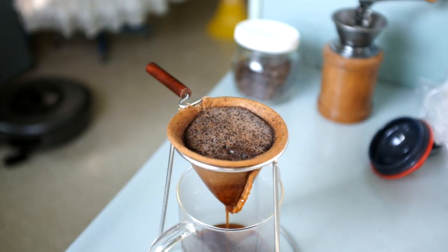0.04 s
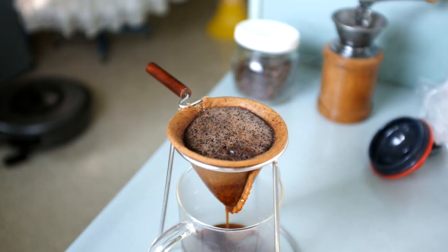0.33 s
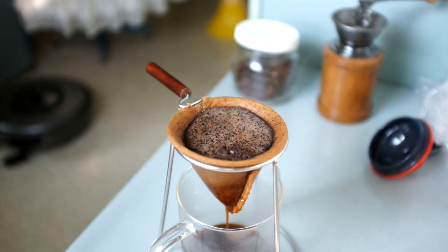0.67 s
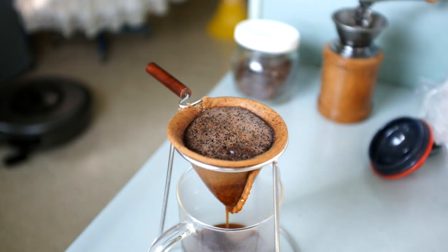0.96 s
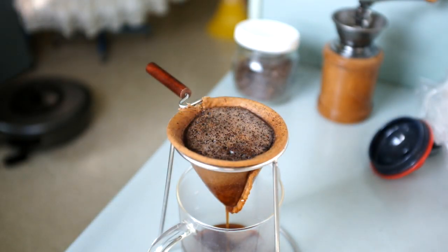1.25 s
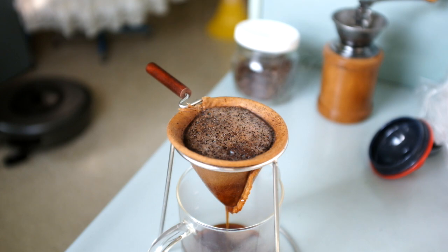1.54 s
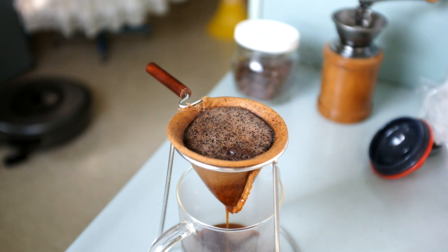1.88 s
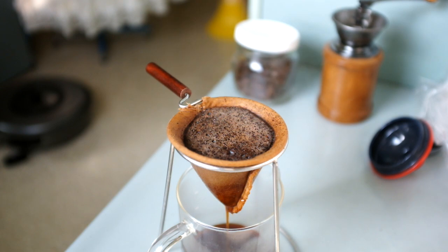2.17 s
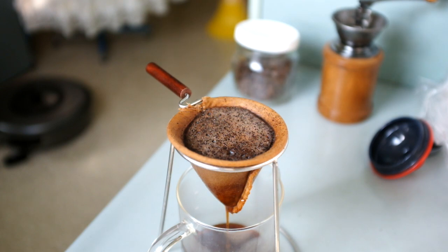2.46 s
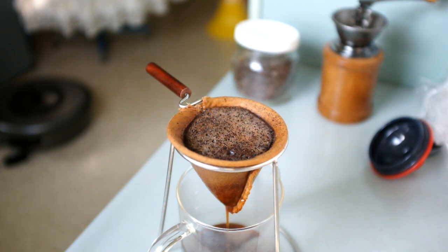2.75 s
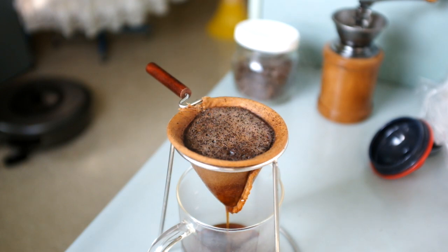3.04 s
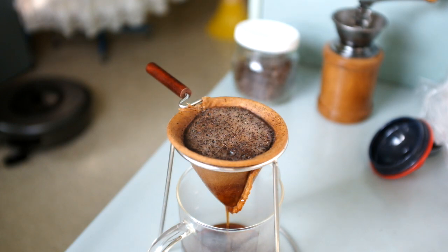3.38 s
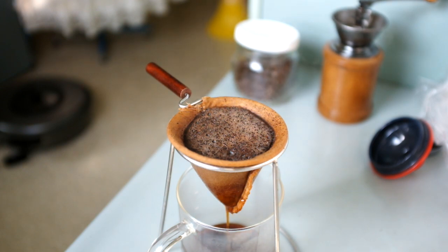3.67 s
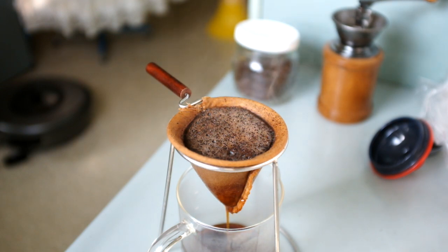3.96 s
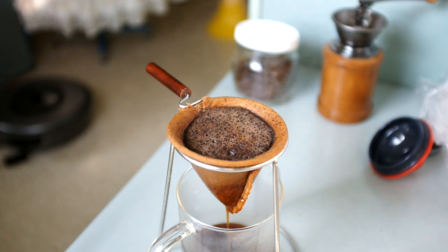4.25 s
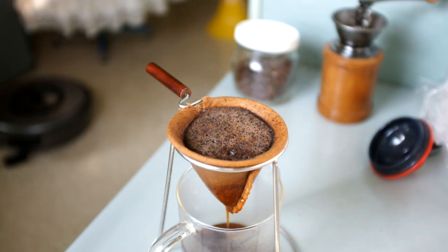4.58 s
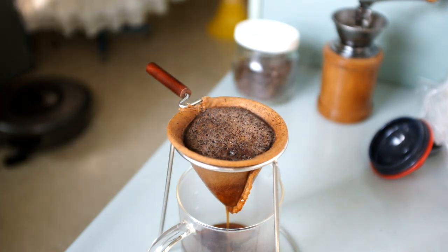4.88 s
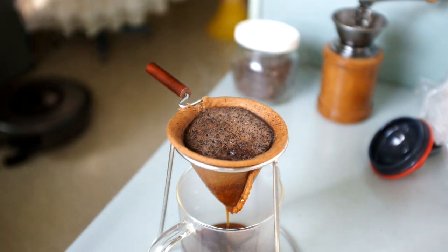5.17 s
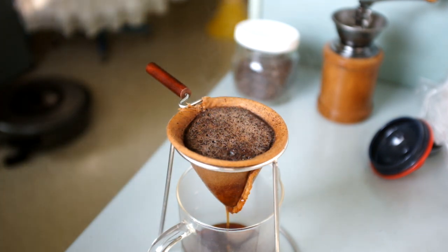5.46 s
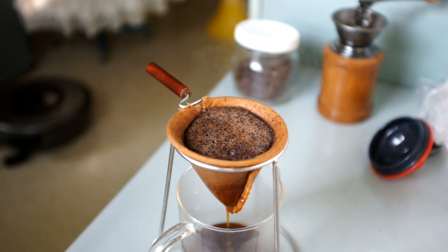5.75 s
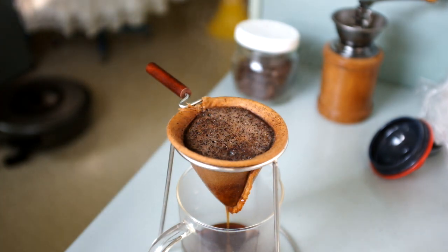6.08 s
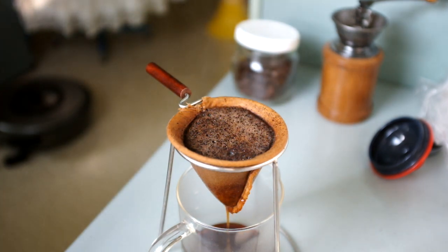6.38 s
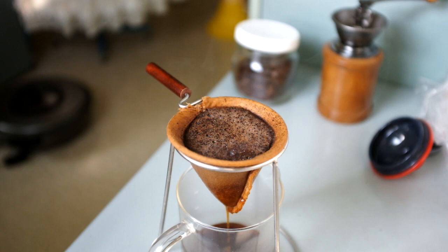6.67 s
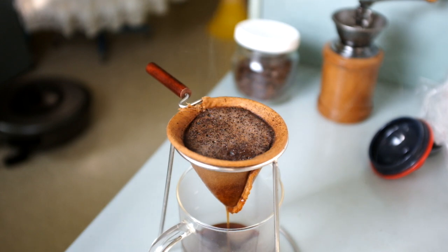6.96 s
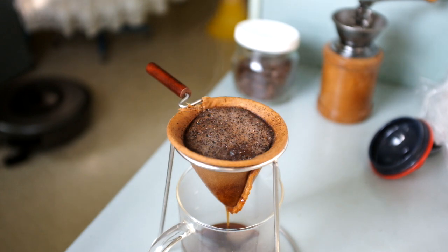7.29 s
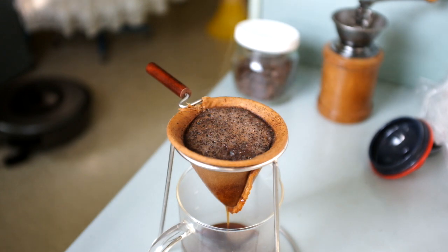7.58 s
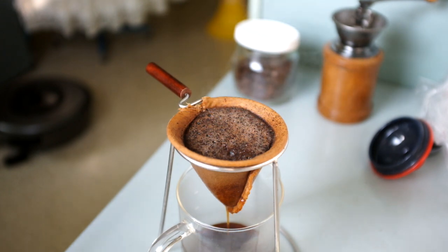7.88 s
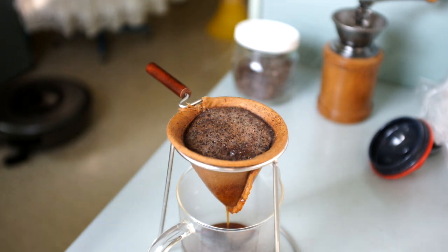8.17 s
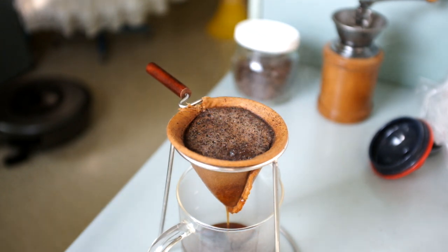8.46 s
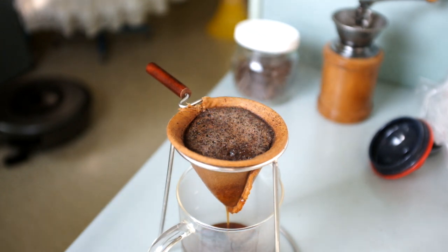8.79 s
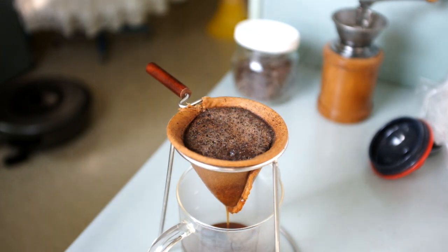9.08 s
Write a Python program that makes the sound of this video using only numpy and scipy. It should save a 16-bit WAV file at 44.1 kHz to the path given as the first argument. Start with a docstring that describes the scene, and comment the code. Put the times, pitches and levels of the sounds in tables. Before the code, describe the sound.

Coffee trickles and drips into a glass server over faint kitchen hum, with a brief metal clatter and one dull knock.

```python
"""Coffee trickles from a cloth filter into a glass server on a kitchen counter.
The thread breaks into drops: each ticks on the surface, plops and rings in the glass; some trap a
tiny bubble. Nearby, metal clatters four times from 4.1 s, and at 6.3 s something is put down with
a dull knock. Soft bloops, scuffs and rustles come and go; the kitchen hums faintly."""
import sys
import numpy as np
from scipy import signal
from scipy.fft import rfft, irfft, next_fast_len
from scipy.io import wavfile

SR = 44100
rng = np.random.default_rng(int(sys.argv[2]) if len(sys.argv) > 2 else 0)


def wrap_up_sound(samples):
    """Save the sound to the file named by the first command line argument, as 16-bit audio."""
    columns = np.atleast_2d(samples).T
    # keep every value between -1 and 1, then stretch to whole-number steps
    tamed = np.clip(columns, -1, 1)
    steps = np.round(tamed * 32767).astype(np.int16)
    wavfile.write(sys.argv[1], SR, steps)


N = 411453

# fat drops; all drop rows are (time [s], plop pitch [Hz], relative plop [dB], relative splash [dB])
FAT_DROPS = [(0.045, 1700, -34.5, -42.5), (0.131, 1310, -35, -47.5), (0.313, 1714, -32.5, -50),
             (0.3416, 1750, -36, -44.5), (0.432, 2270, -36, -62), (0.629, 1850, -37.5, -48),
             (0.818, 2160, -36.5, -44.5), (0.952, 1920, -29, -45.5), (1.0437, 1540, -32, -43),
             (1.112, 1850, -39, -49), (1.182, 1352, -34.5, -52), (1.267, 1620, -52, -43),
             (1.2864, 1900, -40, -38.5), (1.300, 1770, -33.5, -62), (1.358, 1770, -35.5, -49),
             (1.3976, 1850, -29.5, -48.5), (1.444, 1660, -39, -45.5), (1.528, 1890, -31.5, -58),
             (1.699, 1830, -35, -52), (2.009, 2260, -30.5, -41.5), (2.115, 1830, -38.5, -54),
             (2.2073, 1800, -34.5, -62), (2.236, 1740, -31.5, -46), (2.463, 1910, -37, -55),
             (2.529, 2060, -35, -50), (2.5872, 1390, -32, -47), (2.649, 1880, -35, -51),
             (2.756, 1850, -35.5, -51), (2.786, 1800, -33, -49), (2.9675, 1860, -34, -46),
             (3.233, 1790, -36.5, -45.5), (3.783, 2060, -36.5, -53), (3.835, 2050, -35, -46),
             (4.6843, 1950, -34.5, -53), (4.727, 1830, -33, -45.5), (4.758, 1762, -37.5, -43.5),
             (4.915, 1900, -28, -42), (5.056, 2150, -33, -54), (5.120, 1770, -34, -41.5),
             (5.163, 1870, -33.5, -51), (5.254, 1910, -38, -50), (5.3072, 1790, -35, -46),
             (5.426, 1790, -36.5, -57), (5.5469, 1890, -31, -51.5), (5.5973, 2170, -35, -48.5),
             (5.676, 2310, -33.5, -60), (5.7298, 1900, -32.5, -49), (5.771, 2080, -36, -47),
             (5.783, 1660, -33.5, -44), (5.853, 1840, -33, -45), (5.92, 1700, -43, -40.5),
             (6.946, 1887, -33.5, -53), (7.061, 1630, -34, -49.5), (7.177, 2090, -31.5, -42.5),
             (7.206, 1770, -35.5, -51), (7.261, 1890, -38, -43), (7.3468, 2050, -32, -41.5),
             (7.492, 1890, -37, -44), (7.565, 2080, -33, -58), (7.725, 1750, -38, -42),
             (7.999, 1700, -37, -37.5), (8.082, 1830, -33, -46), (8.46, 1800, -36.5, -50),
             (8.676, 1798, -37.5, -38.5), (8.764, 1920, -33.5, -50), (8.902, 1700, -42, -42),
             (9.289, 1750, -40, -49)]
# contacts of the knock: (time [s], relative level [dB])
CONTACTS = [(6.3296, 0), (6.3337, 3.5), (6.3414, -18), (6.3506, -12)]


def trickle():
    """Drop rows: fat drops, drips, their rebounds, fine spatter and spurts."""
    # the thread splutters: (start [s], end [s], relative plop [dB])
    splutters = [(0.55, 0.609, -39), (2.469, 2.535, -37), (2.587, 2.632, -41.5), (2.976, 3.015, -43),
                 (7.14, 7.21, -50), (7.299, 7.381, -46)]
    falling = np.vstack([FAT_DROPS, with_flow(drips(gap_s=0.058, refill_s=0.03), share=0.79)])
    rebounds = [fallback(falling, delay_s=0.0076, size_db=-9.5),
                fallback(falling, delay_s=0.015, size_db=-15.5)]
    spatter = droplets(0, N / SR, per_s=70, hz=1850, plop_db=-46.5, splash_db=-59.5)
    spurts = [droplets(start, end, per_s=260, hz=1750, plop_db=db, splash_db=-59)
              for start, end, db in splutters]
    return np.vstack([falling, *rebounds, with_flow(spatter, share=0.43), *spurts])


def drips(gap_s, refill_s):
    """Drop rows: the thread pinches off at a nearly even pace, except where a fat drop empties it."""
    scatter = np.clip(rng.standard_normal((300, 4)), -2, 1.6)
    s = np.cumsum(gap_s * np.exp(0.35 * scatter[:, 0]))
    hz = 1830 * np.exp(0.066 * scatter[:, 1])
    plop_db, splash_db = -41 + 3 * scatter[:, 2], -51.5 + 5.5 * scatter[:, 3]
    nearest_fat_s = np.abs(s[:, None] - np.array(FAT_DROPS)[:, 0]).min(axis=1)
    return np.c_[s, hz, plop_db, splash_db][(s < N / SR) & (nearest_fat_s > refill_s)]


def fallback(rows, delay_s, size_db):
    """Drop rows: each drop throws up a smaller one, which falls back at a pitch near its own."""
    scatter = rng.standard_normal((len(rows), 3))
    s, hz, plop_db, splash_db = np.transpose(rows)
    landing_s = s + delay_s * np.exp(0.5 * scatter[:, 0])
    step_db = size_db + 2 * scatter[:, 2]
    smaller = np.c_[landing_s, hz * np.exp(0.1 * scatter[:, 1]), plop_db + step_db, splash_db + step_db]
    return smaller[landing_s < N / SR]


def droplets(start_s, end_s, per_s, hz, plop_db, splash_db):
    """Drop rows: small droplets at random times."""
    when, lottery = rng.random((1200, 2)).T
    scatter = np.clip(rng.standard_normal((1200, 3)), -2, 1.7)
    span_s = end_s - start_s
    levels_db = [plop_db, splash_db] + 4 * scatter[:, 1:]
    rows = np.c_[start_s + span_s * when, hz * np.exp(0.14 * scatter[:, 0]), levels_db]
    return rows[lottery < per_s * span_s / len(rows)]


def with_flow(rows, share):
    """Drops grow and shrink with the vigour of the trickle."""
    # vigour: (time [s], relative level [dB])
    flow = [(0, -2), (0.6, -6.5), (0.75, -3.5), (1.15, 1.5), (1.45, -1), (1.75, -2), (2.35, 0), (2.7, 4),
            (3.15, -5), (3.9, -1.5), (4.8, 2.5), (5.9, 1.5), (6.25, -6.5), (6.9, -2), (7.3, 0.5), (7.7, 1),
            (8.6, -3.5), (9.33, -4.5)]
    vigour_db = np.interp(rows[:, 0], *np.transpose(flow))
    return rows + share * np.outer(vigour_db, [0, 0, 1, 1])


def drops(rows, plop_gain_db, splash_gain_db, wall_s, wall_db):
    """Each drop ticks and slaps, and its dent rings; returns direct sound and bounce off the glass."""
    # splash spectrum: (frequency [Hz], relative level [dB])
    splash = [(500, -43), (1200, -13), (2600, 5.5), (4000, -2), (5800, 0), (7500, -2), (9000, -5),
              (10500, -8), (13000, -12), (16000, -40)]
    direct, bounce, t = np.zeros(N), np.zeros((2, N)), clock(768)
    hiss = noise(splash, N + 1024)
    sharp = butter(rng.standard_normal(N + 1024), order=2, hz=8900, kind="high")
    slap_shape = fade(t, t60_s=0.0059) * (1 - np.exp(-t / 0.00017))
    tick_shape = fade(t, t60_s=0.0021)
    spots = rng.random((len(rows), 4))  # landing spot sets two wall delays, tint and tick level
    for (s, hz, plop_db, splash_db), spot in zip(rows, spots):
        i, tint_hz = round(s * SR), np.interp(spot[2], [0, 1], [3000, 11500])
        slap = hiss[i:i + len(t)] * slap_shape
        slap = rms_one(slap + from_db(5.5) * resonate(slap, tint_hz, 0.16 * tint_hz))
        tick = from_db(-16.5 + 11 * spot[3]) * rms_one(sharp[i:i + len(t)] * tick_shape)
        plop = rms_one(bubble(t, hz, rise_s=0.0003, t60_s=0.0067, glide=0.0097))
        drop = from_db(splash_db + splash_gain_db) * (slap + tick)
        drop += from_db(plop_db + plop_gain_db) * plop
        add(direct, s, drop)
        for channel, delay_s in zip(bounce, wall_s * (0.5 + spot[:2])):
            add(channel, s + delay_s, from_db(wall_db) * drop)
    return direct, bounce


def bubble(t, hz, rise_s, t60_s, glide):
    """A damped sine whose pitch slides by the fraction glide as it dies."""
    pitch_hz = hz * (1 + glide * (0.5 - fade(t, t60_s)))
    return np.sin(2 * np.pi * np.cumsum(pitch_hz) / SR) * (1 - np.exp(-t / rise_s)) * fade(t, t60_s)


def pings(gain_db, faint_per_s, low_hz, high_hz):
    """Tiny trapped bubbles ring high and rise in pitch as they near the surface."""
    # clearest bubbles: (time [s], pitch [Hz], relative level [dB])
    clear = [(0.605, 4166, -43.5), (2.159, 2910, -45), (2.463, 5205, -43.5), (2.722, 8680, -41.5),
             (3.314, 5340, -39), (5.634, 7000, -40.5), (5.782, 4740, -44), (7.146, 8750, -45),
             (9.308, 3220, -44)]
    when, pitch, size, lottery = rng.random((200, 4)).T
    faint = np.c_[when * N / SR, low_hz * (high_hz / low_hz) ** pitch, -60 + 12 * size]
    faint = faint[lottery < faint_per_s * N / SR / len(faint)]
    out, t = np.zeros(N), clock(2048)
    for s, hz, db in np.vstack([clear, faint]):
        ping = bubble(t, hz, rise_s=0.00042, t60_s=0.012, glide=0.1)
        add(out, s + 0.000985, from_db(db + gain_db) * ping)
    return out


def fizz(per_s, spread_db, level_db):
    """The finest spray: a steady crackle of tiny bursting bubbles."""
    sizes = from_db(spread_db * np.minimum(rng.exponential(1, N), 3)) * rng.choice([-1, 1], N)
    clicks = sizes * (rng.random(N) < per_s / SR)
    pitches_hz, band = np.geomspace(2600, 10000, 12), rng.integers(0, 12, N)
    crackle = sum(resonate(clicks * (band == k), hz, hz / 7) for k, hz in enumerate(pitches_hz))
    return from_db(level_db) * rms_one(crackle)


def server(x, ring_db):
    """The glass and the air in it ring at their resonances."""
    # resonances: (frequency [Hz], width [Hz], relative gain [dB])
    modes = [(1688, 12, 9.5), (1759, 93, 14), (1890, 35, 11), (2232, 53.5, 18), (2343, 60, 16.5),
             (3500, 68, 2), (4810, 380, 5), (6960, 69, 5.5), (7330, 99, 13.5), (8565, 61, 17),
             (10770, 97, 15.5), (11900, 61, 13.5)]
    return x + from_db(ring_db) * sum(from_db(db) * resonate(x, hz, width) for hz, width, db in modes)


def bloops(gain_db):
    """Low, hollow notes that swell and sag a little."""
    # notes: (time [s], pitch [Hz], relative level [dB])
    notes = [(0.678, 777, -33.5), (1.837, 623, -26), (1.856, 604.5, -26.5), (2.001, 615, -27),
             (2.018, 600, -32.5)]
    out, t = np.zeros(N), clock(8192)
    for s, hz, db in notes:
        add(out, s, from_db(db + gain_db) * bubble(t, hz, rise_s=0.0046, t60_s=0.053, glide=-0.0085))
    return out


def clatter(ring_db):
    """Each blow sets off a dense rattle, whose top dies first, and metal modes in close clusters."""
    # blows: (time [s], relative level [dB], treble [dB], rise [s])
    blows = [(4.0562, -17.5, -1.5, 0.0041), (4.185, -21.5, -3.5, 0.0014), (4.283, -25.5, 1, 0.0029),
             (4.438, -29, -3, 0.004)]
    # rattle spectrum: (frequency [Hz], relative level [dB])
    spectrum = [(50, -12), (130, -2), (200, -15), (370, 1), (800, 0), (1300, 3.5), (1700, 0), (2800, -5.5),
                (5000, -7), (7500, 0), (10000, 1), (13000, -10.5), (16000, -30)]
    # metal modes: (frequency [Hz], relative level [dB])
    modes = [(199, -11.5), (280, -18), (366, -13), (1152, -14), (1416, -8), (2180, -9), (3130, -19),
             (3345, -7), (3830, -12), (4750, -3), (5385, -6), (6907, -8), (7558, -17), (8440, -16)]
    out, t = np.zeros(N), clock(32768)
    strike = 1 + 0.55 * fade(t, t60_s=0.095)  # the contact stands above the ringing
    for s, db, treble_db, rise_s in blows:
        rattle = noise(spectrum, len(t))
        low = butter(rattle, order=1, hz=3500)
        blow = low * fade(t, t60_s=0.4) + from_db(treble_db) * (rattle - low) * fade(t, t60_s=0.14)
        for hz, mode_db in modes:
            cluster = resonate(rng.standard_normal(len(t) + 2048), hz, 29.6 * np.sqrt(hz / 1000))
            ring = rms_one(cluster[2048:]) * fade(t, t60_s=0.36)
            blow += from_db(ring_db + mode_db + treble_db * (hz > 3000)) * ring
        add(out, s, from_db(db) * blow * strike * (1 - np.exp(-t / rise_s)))
    return out


def knock(gain_db, cushion_hz):
    """A solid thing lands and settles in a few quick, cushioned contacts."""
    # modes of thing and counter: (frequency [Hz], relative level [dB], t60 [s])
    modes = [(77, -26, 0.5), (113.7, -23.5, 0.42), (171, -21, 0.12), (389, -6, 0.077), (443, -32, 0.25),
             (623, -1, 0.04), (665, -29, 0.3), (770, -36, 0.42), (847, -6, 0.041), (970, -10, 0.026),
             (1500, -10, 0.013), (2200, -6.5, 0.01), (2180, -32.5, 0.34), (3560, -23, 0.32)]
    out, t = np.zeros(N), clock(32768)
    body = sum(from_db(db) * np.cos(2 * np.pi * hz * t) * fade(t, t60_s) for hz, db, t60_s in modes)
    body = butter(body, order=2, hz=cushion_hz)
    for s, db in CONTACTS:
        add(out, s, from_db(db + gain_db) * body)
    return out


def crack(level_db, t60_s, hz, width_hz):
    """The first hard touch of the knock gives a short, bright click."""
    out, t = np.zeros(N), clock(2048)
    burst = rms_one(resonate(rng.standard_normal(len(t)), hz, width_hz))
    add(out, CONTACTS[0][0], from_db(level_db) * burst * fade(t, t60_s))
    return out


def scuffs():
    """Things being moved: friction noise in one resonance, swelling and fading."""
    # rubs: (start [s], length [s], centre [Hz], width [fraction of centre], level [dB])
    rubs = [(0.03, 0.085, 1220, 0.087, -36), (0.035, 0.061, 780, 0.2, -39), (0, 0.16, 261, 3, -38),
            (2.836, 0.32, 713, 0.14, -45), (4.412, .1, 457, 2.44, -43), (6.579, 0.053, 580, 0.59, -33.5),
            (6.586, 0.061, 129, 0.75, -37.5), (7.53, 0.055, 620, 0.42, -45.5)]
    out, t = np.zeros(N), clock(16384)
    for s, length_s, hz, width, db in rubs:
        rub = resonate(resonate(rng.standard_normal(len(t)), hz, width * hz), hz, 2 * width * hz)
        swell = np.sin(np.pi * np.clip(t / length_s, 0, 1) ** 0.71)
        add(out, s, from_db(db) * rms_one(rub) * swell)
    return out


def rustles(hz, width_hz):
    """Brief, soft hisses of something sliding."""
    # slides: (start [s], length [s], level [dB])
    slides = [(0.015, 0.13, -51), (1.82, 0.35, -54), (2.846, 0.31, -58)]
    out, t = np.zeros(N), clock(16384)
    for s, length_s, db in slides:
        hiss = rms_one(resonate(rng.standard_normal(len(t)), hz, width_hz))
        add(out, s, from_db(db) * hiss * np.sin(np.pi * np.clip(t / length_s, 0, 1)))
    return out


def hum():
    """Narrow, wavering drones of the kitchen."""
    # drones: (frequency [Hz], half-width of each filter [Hz], level [dB])
    drones = [(59.4, 3.2, -57), (114.6, 22, -59), (292.6, 20.7, -61.5), (615, 13, -59.5), (683, 33, -60.5)]
    out = np.zeros(N)
    for hz, half_hz, db in drones:
        band = resonate(rng.standard_normal(N), hz, 2 * half_hz)
        out += from_db(db) * rms_one(resonate(band, hz, 2 * half_hz))
    return out


def kitchen_air(midway_db, fall_db_per_s):
    """Diffuse room noise that slowly grows quieter."""
    # air spectrum: (frequency [Hz], relative density [dB])
    spectrum = [(20, 3), (60, -5), (200, -3), (520, -0.5), (680, -0.5), (1100, -4), (2400, -9),
                (3800, -14.5), (7300, -20), (12800, -23.5), (16000, -37)]
    return diffuse(spectrum, N) * from_db(midway_db - fall_db_per_s * (clock(N) - N / SR / 2))


def reverb(x, t60_s, wet_db, treble_db):
    """Dense reflections that start a few ms late and die away."""
    t = clock(32768)
    onset = np.clip(t / 0.0017 - 1, 0, 1)
    tail = diffuse([(1500, 0), (12000, treble_db)], len(t)) * fade(t, t60_s) * onset
    tail /= np.sqrt(np.mean(np.sum(tail ** 2, axis=1)))
    return from_db(wet_db) * signal.oaconvolve(x[None], tail, axes=1)[:, :N]


def diffuse(spectrum, count):
    """Stereo noise from all around, partly alike in both channels."""
    # left-right likeness: (frequency [Hz], correlation [0..1])
    likeness = [(100, 0.39), (700, 0.66), (1500, 0.72), (3000, 0.25), (7000, 0.061), (12000, 0.85),
                (15000, 1)]
    size = next_fast_len(count)
    hz = np.fft.rfftfreq(size, 1 / SR)
    alike = np.clip(at_hz(likeness, hz), -0.99, 0.99)
    mid, side = rfft(rng.standard_normal((2, size)))
    pair = np.sqrt(1 + alike) * mid + np.sqrt(1 - alike) * side * [[1], [-1]]
    return rms_one(irfft(pair * from_db(at_hz(spectrum, hz)), size)[:, :count])


def microphones(direct, around):
    """Direct sound reaches two ports out of step, rippled by nearby surfaces; the right is louder."""
    # phase between ports: (frequency [Hz], left lead [rad])
    lead = [(100, 0.3), (1500, 0.46), (2200, 0.23), (3200, 1), (5000, 3), (8500, 0.58), (10000, 1.75),
            (12000, 0.2), (15000, -0.5)]
    # balance: (frequency [Hz], left minus right [dB])
    balance = [(60, -4.5), (300, -3.5), (1500, -3), (4000, -3.5), (8000, -0.5)]
    size = next_fast_len(N + 2048)
    hz, knots_hz = np.fft.rfftfreq(size, 1 / SR), np.arange(0, SR / 2, 220)
    half = np.array([[0.5], [-0.5]])
    depth_rad = 0.7 * np.interp(hz, [600, 2000, 9000, 14000], [0, 1, 1, 0.4])
    ripple_rad = depth_rad * np.interp(hz, knots_hz, rng.standard_normal(len(knots_hz)))
    pair = rfft(direct, size) * np.exp(1j * half * (at_hz(lead, hz) + ripple_rad)) + rfft(around, size)
    return irfft(pair * from_db(half * at_hz(balance, hz)), size)[:, :N]


def noise(spectrum, count):
    """Coloured noise of rms 1."""
    size = next_fast_len(count)
    gain = from_db(at_hz(spectrum, np.fft.rfftfreq(size, 1 / SR)))
    return rms_one(irfft(rfft(rng.standard_normal(size)) * gain, size)[:count])


def resonate(x, hz, width_hz):
    """Two-pole resonance, peak gain 1."""
    r = np.exp(-np.pi * width_hz / SR)
    feedback = [1, -2 * r * np.cos(2 * np.pi * hz / SR), r * r]
    return signal.lfilter(np.array([1, 0, -1]) * (1 - r * r) / 2, feedback, x + 1e-18)


def butter(x, order, hz, kind="low"):
    """Maximally flat filter."""
    return signal.sosfilt(signal.butter(order, hz, kind, fs=SR, output="sos"), x)


def from_db(db):
    """Decibels to gain."""
    return 10 ** (np.asarray(db) / 20)


def rms_one(x):
    """Scale to rms 1."""
    return x / np.sqrt(np.mean(x ** 2) + 1e-20)


def at_hz(points, hz):
    """Read a table on a log-frequency axis."""
    points_hz, value = np.transpose(points)
    return np.interp(np.log(hz + 1e-3), np.log(points_hz), value)


def clock(count):
    """Sample times in s."""
    return np.arange(count) / SR


def fade(t, t60_s):
    """Exponential decay."""
    return np.exp(-np.log(1000) * t / t60_s)


def add(track, s, sound):
    """Mix a sound in at time s."""
    i = max(round(s * SR), 0)
    part = track[..., i:i + sound.shape[-1]]
    part += sound[..., :part.shape[-1]]


def scene():
    """Coffee in the server close by, handling noises and kitchen air around it."""
    splashes, bounce = drops(trickle(), plop_gain_db=-12.5, splash_gain_db=-4.5,
                             wall_s=0.0021, wall_db=1.5)
    trapped = pings(gain_db=18, faint_per_s=5, low_hz=2890, high_hz=8500)
    coffee = server(splashes + trapped + fizz(per_s=220, spread_db=8.5, level_db=-63), ring_db=-7)
    thud = knock(gain_db=-6, cushion_hz=1330) + crack(level_db=-32, t60_s=0.033, hz=6000, width_hz=7000)
    soft = bloops(gain_db=11) + scuffs() + rustles(hz=8000, width_hz=4700)
    metal = clatter(ring_db=-2.5)
    room = reverb(coffee, t60_s=0.064, wet_db=-3.5, treble_db=0)
    room += reverb(coffee, t60_s=0.38, wet_db=-12, treble_db=-16)
    room += reverb(thud, t60_s=0.66, wet_db=-13, treble_db=-6)
    room += reverb(soft + metal, t60_s=0.5, wet_db=-9, treble_db=-8.5)
    air = kitchen_air(midway_db=-47.5, fall_db_per_s=0.39)
    return microphones(coffee + thud + soft + metal + hum(), bounce + room + air)


def record(dry):
    """Soft saturation rounds the peaks; a steep low-pass cuts above 16.1 kHz."""
    lowpass = signal.ellip(10, 0.1, 80, 16100, fs=SR, output="sos")
    return signal.sosfilt(lowpass, 1.241 * np.tanh(dry / 1.349))


dry = scene()
out = record(dry)
wrap_up_sound(out)
```